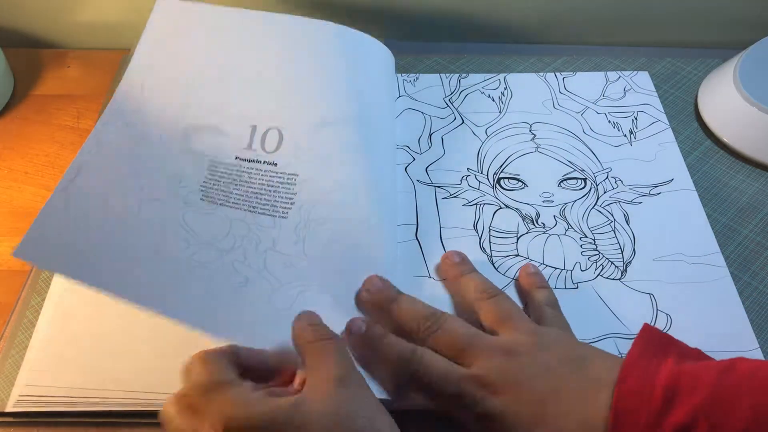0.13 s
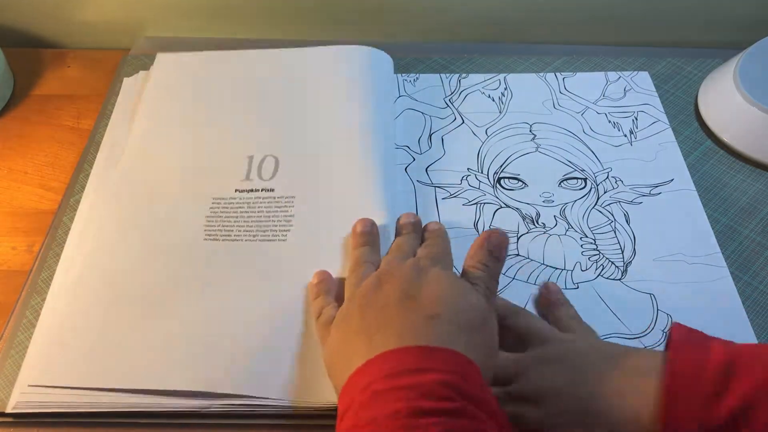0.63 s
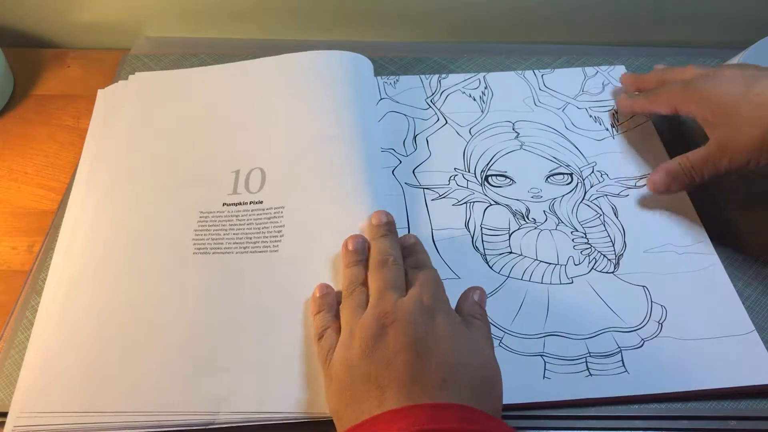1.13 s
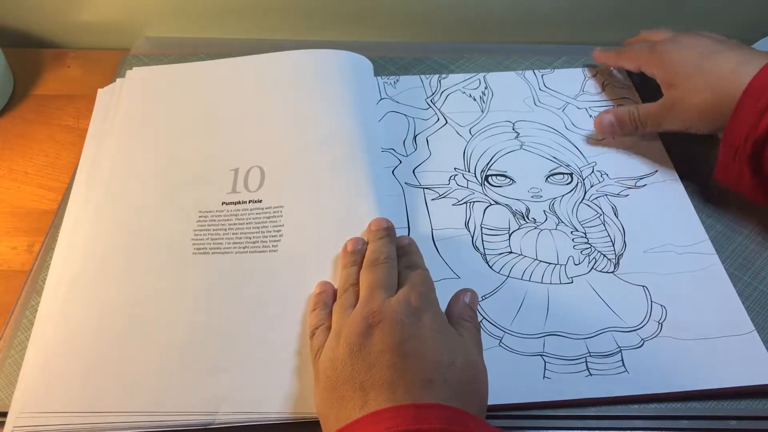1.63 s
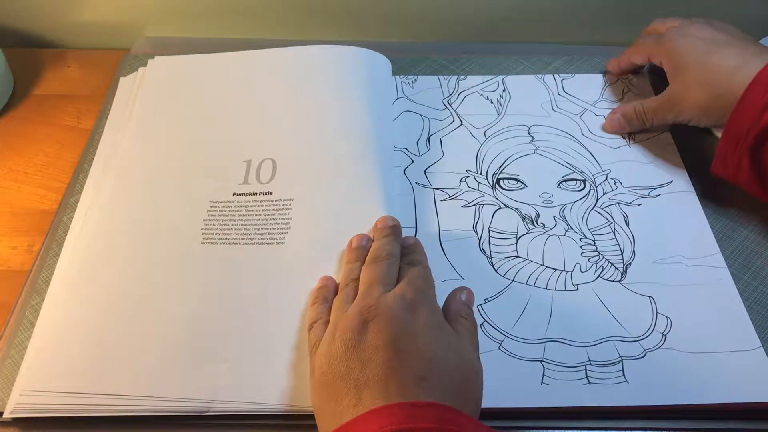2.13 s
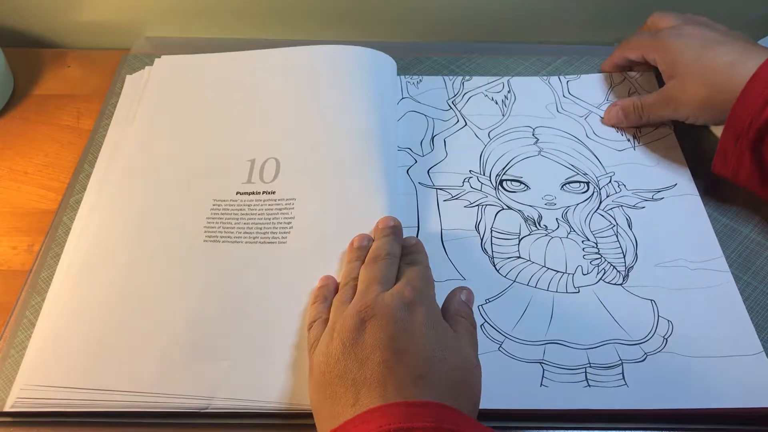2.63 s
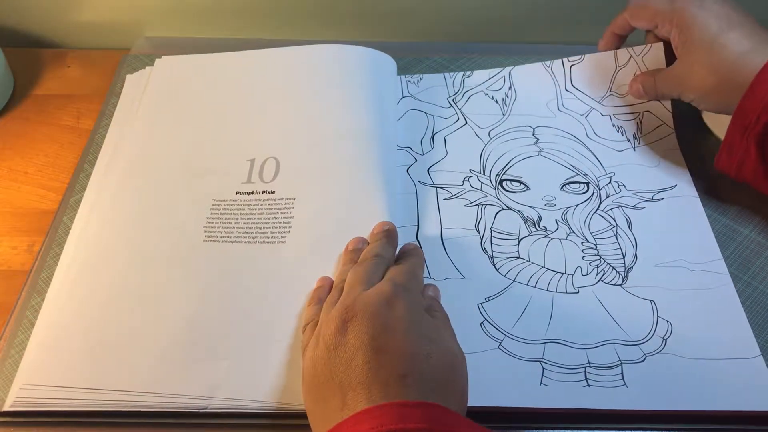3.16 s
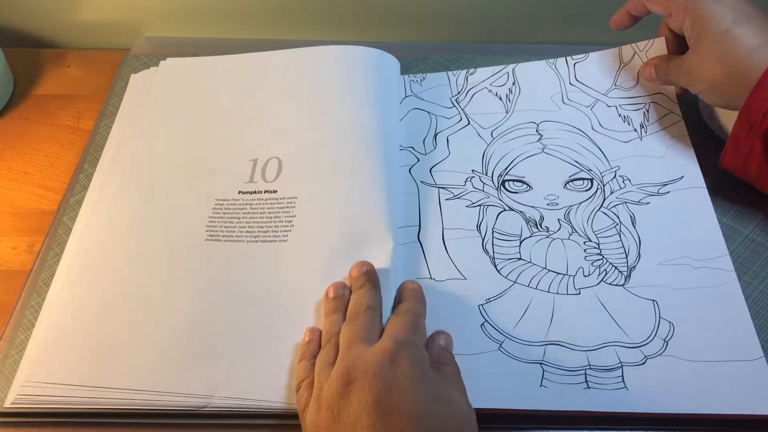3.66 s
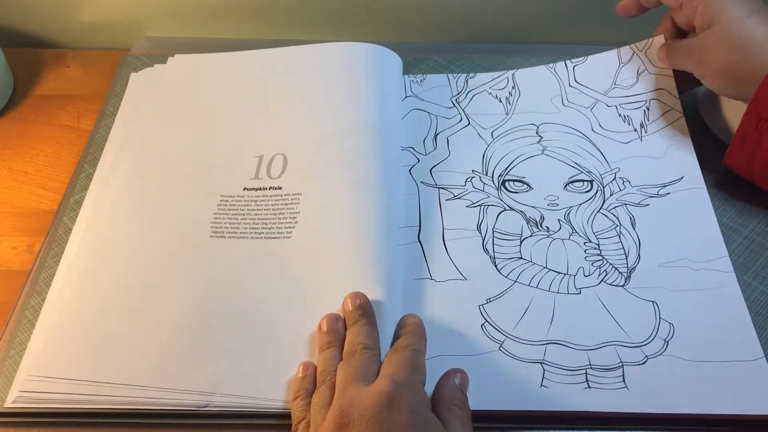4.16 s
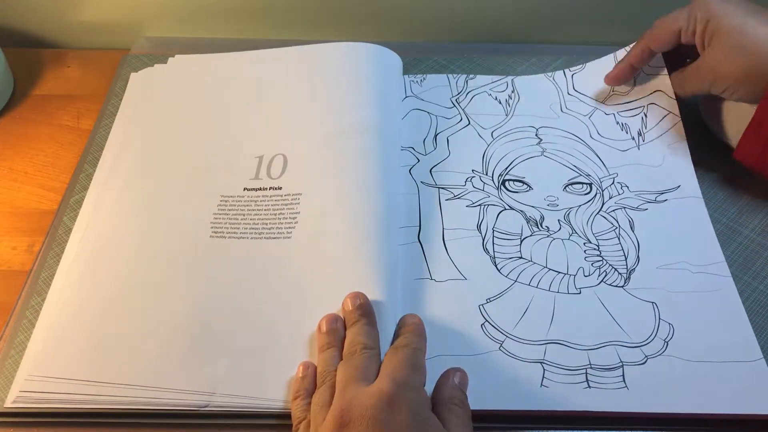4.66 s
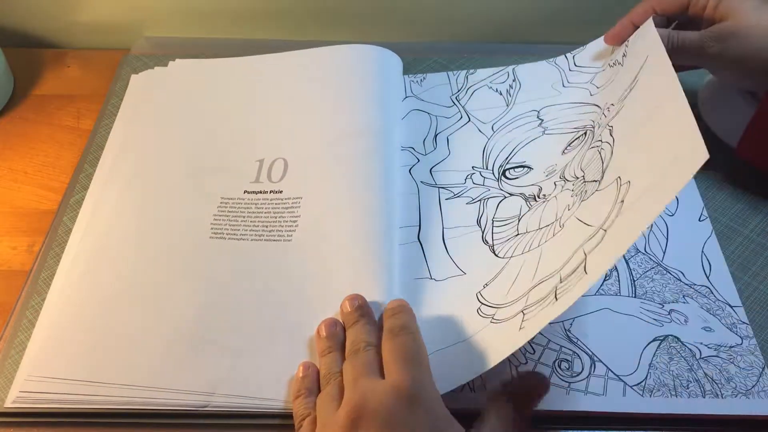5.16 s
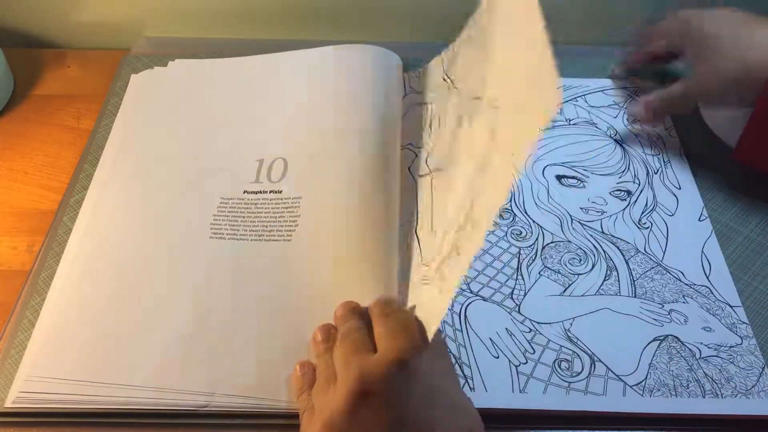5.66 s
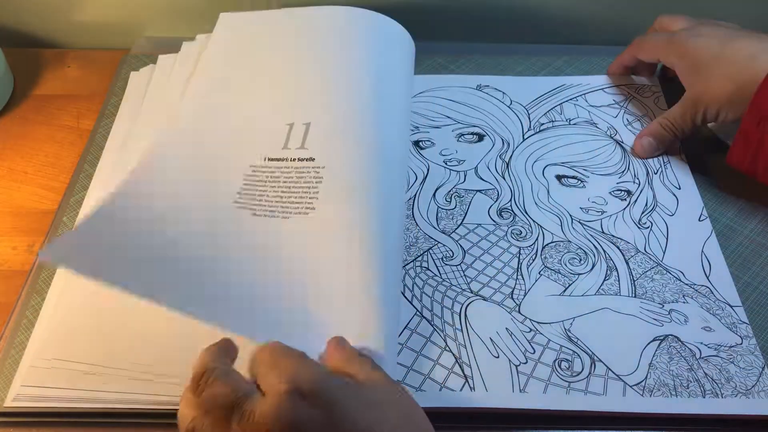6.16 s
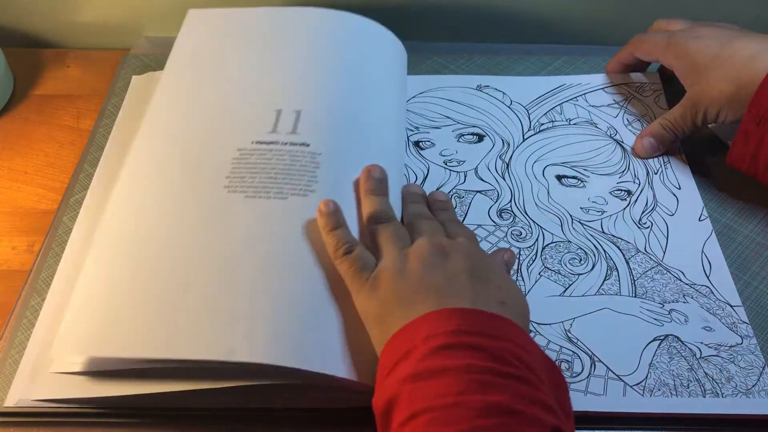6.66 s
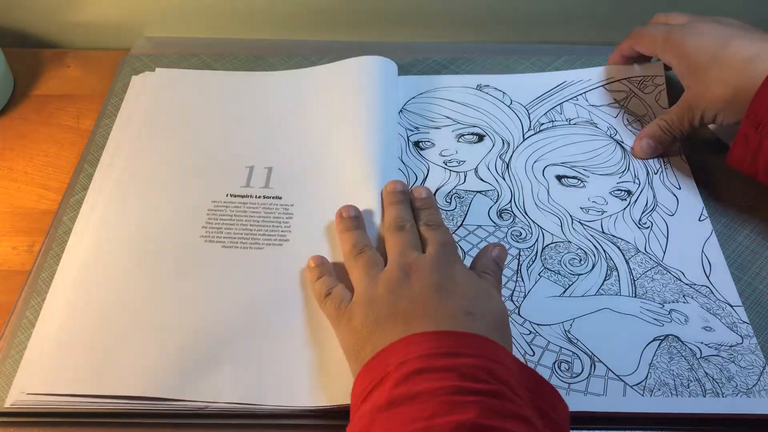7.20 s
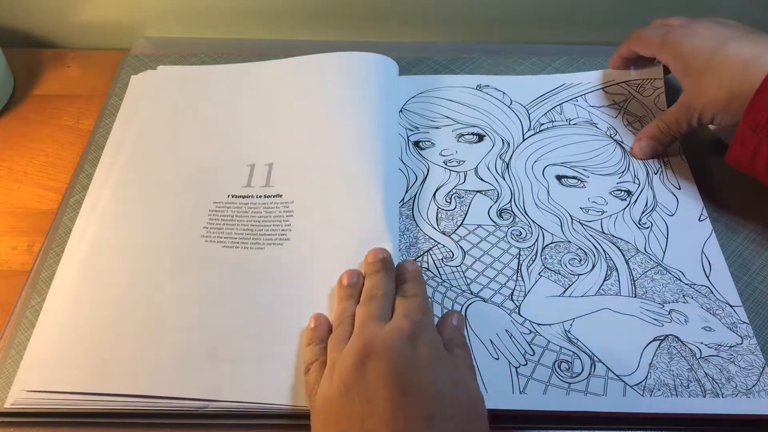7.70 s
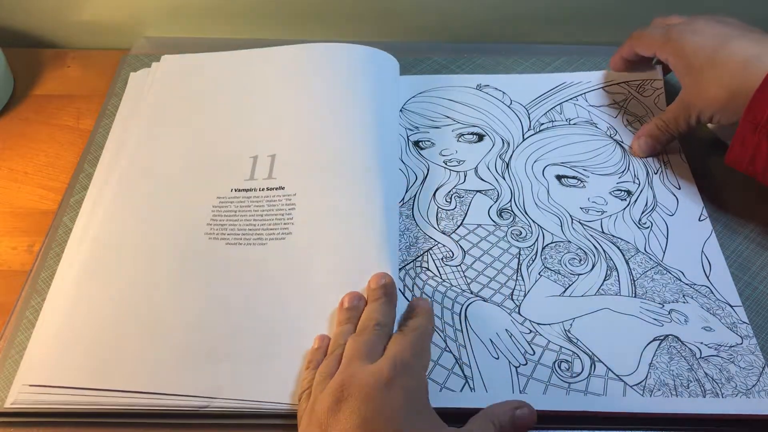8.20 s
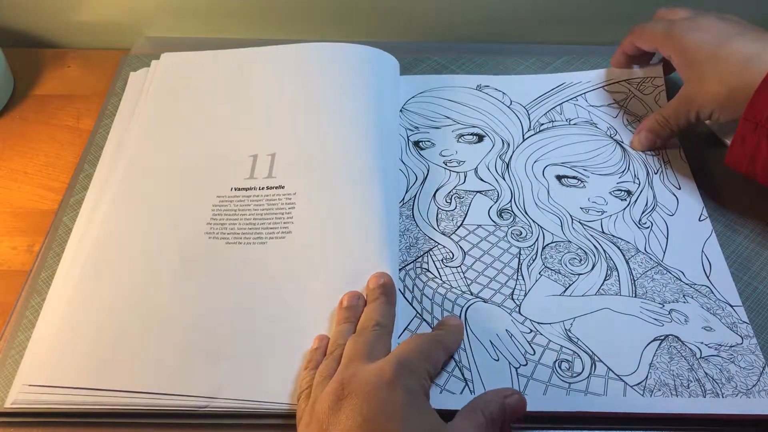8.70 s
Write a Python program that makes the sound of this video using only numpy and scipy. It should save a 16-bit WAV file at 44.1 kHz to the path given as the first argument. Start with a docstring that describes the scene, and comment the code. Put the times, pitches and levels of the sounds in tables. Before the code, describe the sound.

Close to the microphone, a thin page of a large book snaps over loudly and is smoothed flat with dry brushing. Quiet follows, with only faint fingertip ticks and rubs. The sheet edge is worked and crackles, then another page turns with a bright snap and flap. Soft taps and tiny ticks finish in a small room with faint air noise and low distant traffic.

```python
"""Thin pages of a large book crackle and hiss as hands lift, turn and smooth them on a desk in a small room.
Creases snap as noise bursts through a sheet resonance, with a room echo; skin and paper rub as coloured
grains; bent parts of the sheet sing in narrow bands. Behind: steady air noise, far traffic in two low room
modes, wavering hums, faint passing tones, and a bird that starts to chirp at the very end."""
import sys
import numpy as np
from scipy import signal
from scipy.fft import rfft, irfft, next_fast_len
from scipy.io import wavfile
from scipy.ndimage import map_coordinates

SR = 44100
rng = np.random.default_rng(int(sys.argv[2]) if len(sys.argv) > 2 else 0)


def ratio_of_db(decibels):
    """Turn decibels (scalar or array-like) into linear amplitude factors; 0 dB maps to 1."""
    return 10 ** (np.asarray(decibels, float) / 20)


def wav_out(sig):
    """Save sig, one row per channel (or a flat mono array), as 16-bit PCM at SR to the path in sys.argv[1]."""
    wavfile.write(sys.argv[1], SR, np.round(np.clip(np.atleast_2d(sig).T, -1, 1) * 32767).astype(np.int16))


N = 388962

# Room air spectrum. Each row: frequency in Hz, relative density in dB.
AIR_SPECTRUM = [(53, -42), (90, 1.5), (142, -4), (215, -13), (280, -11), (574, -23), (991, -30.5),
                (3290, -43.5), (4270, -40), (4970, -50.5), (9160, -47.5), (10400, -45), (13000, -48.5),
                (15500, -41.5), (16500, -54)]
AIR_DB = -55
# Traffic level. Each row: time in seconds, lower mode in dB, upper mode in dB.
TRAFFIC_LEVELS = [(0.0, -42, -60), (0.22, -51.5, -46), (0.32, -45, -53), (2.97, -47.5, -55.5),
                  (3.66, -50, -47), (6.71, -52, -54), (8.35, -50.5, -48.5), (8.4, -66, -51.5),
                  (8.82, -47, -45.5)]
# Two lowest room modes. Each row: frequency in Hz, width in Hz.
ROOM_MODES = [(46, 16), (66, 13.3)]
# Wavering hums. Each row: frequency in Hz, width in Hz, level in dB.
HUMS = [(119.8, 5.3, -61.5), (163.4, 22, -62.5), (247, 1.6, -76)]
# Faint passing tones. Each row: start in seconds, end in seconds, frequency in Hz, level in dB.
PASSING_TONES = [(2.2, 4.3, 475, -69), (2.6, 3.6, 533, -77), (7.4, 8.6, 452, -75), (8.0, 9.2, 966, -77)]
CHIRP_S, CHIRP_HZ, CHIRP_WIDTH_HZ, CHIRP_DB = 8.78, 3437, 174, -40
# Echo of room and desk. Each row: band in Hz, relative level in dB, 60 dB decay in seconds (see ECHO_MAX_T60_S).
ECHO_BANDS = [(390, -14.5, 0.3), (780, -1.5, 0.18), (1300, -4.5, 0.19), (2170, 7, 0.067), (3780, 4.5, 0.18),
              (5610, -1, 0.12), (9900, -3, 0.22)]
ECHO_MAX_T60_S = 0.28

# Spectra of the three friction scales. Each row: frequency in Hz, relative density in dB.
FLUTTER_SPECTRUM = [(220, -18), (380, 0), (505, -6), (748, -1.5), (1130, -2.5), (1230, -2.5), (2500, -11),
                    (3250, -56), (5500, -120)]
RASP_SPECTRUM = [(880, -20.5), (1500, 5.5), (1900, -0.5), (2240, 0.5), (2550, 2.5), (2880, 1), (4290, -4.5),
                 (5000, -4), (5760, -5.5), (8000, -19), (10400, -46.5), (17600, -120)]
HISS_SPECTRUM = [(3240, -36.5), (5500, -12.5), (6830, -1), (7590, -6.5), (9820, -1), (10600, -1),
                 (11600, -4), (15100, -3.5), (16200, -19.5), (16500, -38.5)]
# Skin and paper slide over paper. Each row: start in seconds, hold in seconds, 20 dB fade in seconds,
# rasp level in dB, hiss re rasp in dB.
SLIDES = [(0.0, 0.064, 0.6, -64.5, 2.5), (.11, 0.066, 0.0347, -46, -7), (.225, 0.017, -0.02, -46.5, 1.5),
          (.47, 0.017, 0.8, -69, -4.5), (.58, 0.086, 0.85, -64.5, 0), (.66, 0.039, 0.5, -64.5, 5),
          (.76, 0.0035, 0.12, -60, -0.5), (.89, 0.01, 0.35, -59.5, -3.5), (1.055, 0.0051, 0.22, -58, -1),
          (1.195, 0.009, 0.1, -60, 1.5), (1.4, .01, 0.8, -77, 1), (1.68, .12, 0.9, -72.5, 3.5),
          (1.846, 0.017, 0.22, -63, -2), (2.02, 0.087, -0.1, -68, 1), (2.179, 0.015, -0.3, -71, -2),
          (2.275, .005, 0.14, -70.5, 2), (2.345, 0.0087, 0, -67.5, 1.5), (2.58, .01, .15, -75, 3),
          (2.644, .005, 0.06, -65, -1.5), (2.755, 0.058, 0.34, -73.5, 3), (3.03, .085, .03, -55, -3),
          (3.17, .1, -0.04, -57.5, -5), (3.29, 0.019, 0.03, -56.5, 1.5), (3.38, .1, 1.5, -76, -4),
          (3.52, .23, 0.2, -59, -1.5), (3.8, 0.008, 0.25, -64.5, 2), (4.06, 0.039, 1, -67, -5),
          (4.121, 0.0057, 0.15, -57, -0.5), (4.24, 0.056, 0.03, -58.5, 2), (4.455, 0.028, -0.6, -62, -13),
          (4.59, 0.13, .05, -56.5, -6.5), (4.715, 0.0076, .1, -56, -9.5), (4.81, 0.03, 0.16, -59.5, -8.5),
          (4.865, 0.031, 0.03, -49, -9), (5.0, .14, 0.24, -66, -7), (5.23, 0.074, 1.2, -72.5, -3),
          (5.44, .04, 0.8, -64, -4), (5.495, 0.031, 0.09, -56, -2.5), (5.83, 0.21, 0.75, -59.5, 2),
          (6.09, 0.14, 0.16, -56, -4.5), (6.29, 0.0033, 0.0766, -47, 1.5), (6.35, 0.07, 0.1, -56.5, -7.5),
          (6.455, 0.0055, 0.38, -52.5, -1.5), (6.7, 0.0064, .35, -60, -1), (7.244, 0.023, .04, -65, -3.5),
          (7.36, 0.086, -0.34, -69.5, 4.5), (7.46, 0.22, 0.03, -60.5, -1.5), (7.71, 0.11, .5, -66.5, 2.5),
          (8.07, 0.11, 0.5, -75, 5.5), (8.2, 0.0043, 0.08, -58.5, -5), (8.24, .006, 0, -66, -5),
          (8.338, .05, 0.1, -68, -6), (8.575, .02, 0.07, -66.5, 13.5), (8.72, .015, .06, -69.5, 8.5)]
# The loose sheet shakes and settles. Each row: start in seconds, hold in seconds, 20 dB fade in seconds,
# flutter level in dB.
SHAKES = [(.14, .01, 0.25, -47.5), (0.23, 0.079, 0.0553, -43.5), (0.657, 0.072, 0.17, -51),
          (1.042, .01, 0.08, -54.5), (1.873, .03, 0.05, -63.5), (2.05, .03, -2.8, -66.5),
          (2.648, .01, 0, -62.5), (2.782, .06, 0.2, -69), (3.247, .055, 0.1, -59.5),
          (4.719, .01, -0.04, -52), (4.816, .04, -0.35, -56), (4.87, 0.03, 0, -49),
          (5.004, .19, -0.05, -62.5), (5.3, .03, 2.2, -68.5), (5.555, .04, 0.14, -54.5),
          (6.29, .01, 0.15, -39), (6.35, .05, 0.48, -67), (7.06, .01, .08, -54), (7.716, .005, 0.09, -52),
          (7.974, .01, .2, -62), (8.198, .005, -0.02, -57)]
RISE_S, MIN_FADE_S = 0.036, 0.01   # 20 dB rise of every contact; shorter or negative fades use the minimum
REST_FLUTTER_DB, REST_RASP_DB, REST_HISS_DB = -72, -83, -84   # hands resting on the book
SLIDE_FLUTTER_DB, SHAKE_RASP_DB, SHAKE_HISS_DB = -6, -20.5, -25.5   # re the motion that stirs them
RING_HZ, RING_DB_PER_DB = 3900, 0.15   # rasp ring pitch where hiss equals flutter; pitch dB per dB of excess
# Bent part of the sheet sings. Each row: start in seconds, hold in seconds, 20 dB fade in seconds,
# level in dB, pitch in Hz.
EDGE_RINGS = [(2.26, .08, .04, -75.5, 4200), (0.894, 0.048, 0.45, -67, 3100), (2.96, .04, -1.1, -69, 4070),
              (3.028, 0.073, 0.14, -59.5, 3700), (3.185, 0.13, .04, -61.5, 3400),
              (3.625, 0.011, 0.02, -52, 1800), (4.1, 0.082, 0.2, -66, 4400), (4.23, .04, .1, -62, 3130),
              (4.604, 0.13, 0.2, -67, 4500), (4.72, .03, 0.2, -57, 1620), (4.87, 0.013, 0.09, -49, 1660),
              (4.983, 0.16, -0.06, -67, 4300), (5.034, 0.16, -0.4, -63.5, 1600),
              (5.5, 0.03, 0.2, -62, 2700), (5.6, 0.025, 0.4, -57, 580), (5.726, .015, 0.3, -58, 430),
              (5.848, .012, .04, -64.5, 450), (5.86, 0.064, 0.5, -62.5, 2800), (6.0, .02, 0.5, -61.5, 417),
              (6.455, .025, -0.1, -54, 2670), (7.04, .015, -0.06, -61.5, 810),
              (7.255, 0.017, -0.2, -71, 3900), (7.446, 0.025, -0.3, -66, 3900), (7.7, .02, .07, -52, 800),
              (7.993, .015, 0.04, -52.5, 780), (8.24, 0.021, -0.03, -61, 4000),
              (8.332, 0.034, 0.14, -61.5, 3980), (8.333, 0.043, .1, -65, 5960),
              (8.578, 0.064, -0.4, -67, 4100), (8.72, .02, .04, -74, 4180)]
EDGE_WIDTH_SHARE = 0.18   # of the pitch
# Buckling snaps. Each row: time in seconds, nominal peak in dB, sheet ring in Hz, crack re ring in dB,
# length in ms.
SNAPS = [(0.096, -8, 1440, -32, 0.32), (0.0987, -4.5, 1340, -4.5, 1.25), (0.2281, -36, 1300, 7.5, 3),
         (0.5205, -33, 1410, -23, 2.06), (0.5657, -36, 2400, -12, 0.77), (0.6552, -34.5, 804, 3.5, 0.62),
         (0.6728, -9.5, 1300, -19.5, 1.07), (1.3003, -40, 2350, -4, 0.9), (1.8453, -41, 4050, 6.5, 0.32),
         (2.1216, -51, 4500, 4, 1.7), (2.154, -45, 4350, 1, 1.6), (2.1727, -45, 4350, 6, 1.7),
         (2.5535, -38.5, 660, -19, 1.14), (2.749, -54.5, 3800, 7, 0.6), (2.8258, -57, 3800, 10, 2.6),
         (3.0224, -44, 4220, -8, 1.2), (3.6126, -27.5, 1300, -2.5, 2.3), (4.1168, -43, 4090, 5, 2.7),
         (4.461, -47, 3680, -13, 0.9), (4.563, -61, 1500, 0, 1.5), (4.583, -51, 1200, 0, 1.5),
         (4.71, -36.5, 1730, -11, 0.41), (4.8665, -32.5, 1190, -6, 5.7), (5.5493, -33, 1620, -22.5, 3.1),
         (5.5961, -31.5, 720, -8.5, 5.1), (5.605, -31, 1560, -13, 2.5), (5.627, -61, 3920, -10.5, .88),
         (5.7014, -52, 3800, -4, 1.3), (6.273, -22, 1500, -3, 1.85), (6.2758, -14, 1880, -5.5, 3.5),
         (6.5, -38, 1300, -17, 2.4), (6.546, -42, 2500, -3, 1.3), (6.557, -42, 2470, 0, 1.1),
         (6.6944, -42.5, 1470, -17, 1.3), (6.756, -47, 2000, -12, 1.1), (6.8552, -37.5, 780, -27, 1.8),
         (7.0324, -27, 1030, -15, 2.5), (7.2354, -56, 2510, 8.5, 2.1), (7.4394, -40.5, 3700, -16, 0.78),
         (7.6942, -24, 910, 4.5, 1.56), (7.9656, -39, 1300, -21, 1.9), (7.9782, -26.5, 920, -19.5, 2.3),
         (8.1898, -37, 1490, 4, 0.58), (8.2002, -49, 1510, 7, 1.1), (8.2146, -37, 1430, 3.5, 0.62),
         (8.2245, -48, 1490, -8, 0.94), (8.2378, -40, 4160, -15, 0.9), (8.464, -65, 4000, 3.5, 1.5),
         (8.535, -60, 4000, 3, 1.5), (8.559, -44.5, 4240, 14, 0.35), (8.5827, -42, 4330, -19, 0.61),
         (8.743, -52, 3800, 8, 1.3)]
SNAP_ECHO_DB, ECHO_DB_PER_DOUBLING = -10.5, 3   # echo of a 1 ms snap; longer creases feed the room more
# Microphone housing resonances and notches. Each row: frequency in Hz, width in Hz, share added.
HOUSING = [(3100, 190, 0.19), (4330, 310, 0.65), (4960, 85, -0.55), (5660, 550, 0.15), (6710, 170, -0.79),
           (10420, 1600, -0.63)]


def rms_one(x):
    """Scale to unit power."""
    return x / np.sqrt(np.mean(x ** 2) + 1e-20)


def coloured(x, spectrum):
    """Give a white signal a spectrum, interpolated over log frequency; rms 1."""
    hz, db = np.transpose(spectrum)
    size = next_fast_len(len(x))
    log_hz = np.log(np.arange(size // 2 + 1) * SR / size + 1)
    gain = ratio_of_db(np.interp(log_hz, np.log(hz), db, -120, -120))
    return rms_one(irfft(rfft(x, size) * gain, size)[:len(x)])


def resonate(x, hz, width_hz):
    """Two-pole resonance with about unit gain at its peak."""
    r = np.exp(-np.pi * width_hz / SR)
    poles = [1, -2 * r * np.cos(2 * np.pi * hz / SR), r * r]
    return signal.lfilter([(1 - r * r) / 2, 0, (r * r - 1) / 2], poles, x)


def resonate_twice(x, hz, width_hz):
    """Two equal resonances in series, for steeper skirts."""
    return resonate(resonate(x, hz, width_hz), hz, width_hz)


def swept(x, centre_hz, share):
    """Resonance whose centre moves, stepped every 256 samples; width a share of the centre; rms 1."""
    out, state = np.empty(N), np.zeros(2)
    for i in range(0, N, 256):
        hz = centre_hz[i]
        r = np.exp(-np.pi * share * hz / SR)
        gain = np.sqrt(1 - r * r)
        poles = [1, -2 * r * np.cos(2 * np.pi * hz / SR), r * r]
        out[i:i + 256], state = signal.lfilter([gain, 0, -gain], poles, x[i:i + 256], zi=state)
    return rms_one(out)


def drift(rate_hz):
    """Smooth random curve of about unit spread through rate_hz knots a second."""
    knots = rng.standard_normal(2000)
    return map_coordinates(knots, [np.arange(N) * rate_hz / SR], order=3)


def narrow(hz, width_hz):
    """Narrow-band noise, its first second dropped while the filter settles; rms 1."""
    return rms_one(resonate_twice(rng.standard_normal(N + SR), hz, width_hz)[SR:])


def air():
    """Room air: coloured noise with a slow level drift."""
    return ratio_of_db(AIR_DB + 1.5 * drift(2.77)) * coloured(rng.standard_normal(N), AIR_SPECTRUM)


def traffic():
    """Far traffic: noise in the two lowest room modes, each with its own level curve."""
    t, out = np.arange(N) / SR, np.zeros(N)
    s, *mode_levels = np.transpose(TRAFFIC_LEVELS)
    for db, (hz, width_hz) in zip(mode_levels, ROOM_MODES):
        out += ratio_of_db(np.interp(t, s, db)) * narrow(hz, width_hz)
    return out


def hums():
    """Noise bands so narrow that they sound as wavering hums."""
    return sum(ratio_of_db(db) * narrow(hz, width_hz) for hz, width_hz, db in HUMS)


def passing_tones():
    """Narrow noise bands that swell and fade under a root-sine arch."""
    t, out = np.arange(N) / SR, np.zeros(N)
    for start, end, hz, db in PASSING_TONES:
        swell = np.sqrt(np.sin(np.pi * np.clip((t - start) / (end - start), 0, .9999)))
        out += ratio_of_db(db + 1.5 * drift(5)) * swell * narrow(hz, 10)
    return out


def bird():
    """Start of a chirp: a whistle of narrow, uneven noise that swells in within 8.4 ms."""
    t = np.arange(N) / SR - CHIRP_S
    whistle = narrow(CHIRP_HZ, CHIRP_WIDTH_HZ)
    return ratio_of_db(CHIRP_DB) * np.clip(t / 0.0084, 0, 1) * whistle / np.std(whistle[t > 0])


def echo(x):
    """Dense reflections that build in 2 ms and die band by band; unit-energy response."""
    t, answer = np.arange(SR // 2) / SR, 0
    for hz, db, t60_s in ECHO_BANDS:
        band = rms_one(resonate_twice(rng.standard_normal(len(t)), hz, .65 * hz))
        decay = ratio_of_db(db - 60 * t / min(t60_s, ECHO_MAX_T60_S))
        answer = answer + band * decay * np.minimum(t / .002, 1)
    return signal.fftconvolve(x, answer / np.sqrt(np.sum(answer ** 2)))[:N]


def grains(per_s, spread_db, smooth):
    """Fibres catch and let go: uneven ticks on top of a smooth friction noise."""
    sizes = ratio_of_db(spread_db * np.minimum(rng.exponential(1, N), 4)) * rng.choice([-1, 1], N)
    born = rng.random(N) < per_s / SR
    return rms_one(sizes * born) + smooth * rng.standard_normal(N)


def contacts(s, hold_s, fade_s, db):
    """Summed power over time of contacts that rise, hold and fade, linearly in dB."""
    t, power = np.arange(0, N, 64) / SR, 0
    for start, hold, fade, level_db in zip(s, hold_s, fade_s, db):
        rise_db = 20 * np.maximum((start - t) / RISE_S, 0)
        fade_db = 20 * np.maximum(t - start - hold, 0) / max(fade, MIN_FADE_S)
        power = power + ratio_of_db(level_db - rise_db - fade_db) ** 2
    return np.interp(np.arange(N) / SR, t, power)


def friction_levels():
    """Flutter, rasp and hiss in dB, each stirred by slides, shakes and rest; rasp ring pitch in Hz."""
    *when, rasp_db, hiss_re_rasp_db = np.transpose(SLIDES)
    slide = contacts(*when, rasp_db)
    fine = contacts(*when, rasp_db + hiss_re_rasp_db)
    shake = contacts(*np.transpose(SHAKES))
    flutter_db = 10 * np.log10(shake + slide * ratio_of_db(SLIDE_FLUTTER_DB) ** 2 + ratio_of_db(REST_FLUTTER_DB) ** 2)
    rasp_db = 10 * np.log10(slide + shake * ratio_of_db(SHAKE_RASP_DB) ** 2 + ratio_of_db(REST_RASP_DB) ** 2)
    hiss_db = 10 * np.log10(fine + shake * ratio_of_db(SHAKE_HISS_DB) ** 2 + ratio_of_db(REST_HISS_DB) ** 2)
    ring_hz = np.clip(RING_HZ * ratio_of_db(RING_DB_PER_DB * (hiss_db - flutter_db)), 2000, 7000)
    return flutter_db, rasp_db, hiss_db, ring_hz


def rubbing():
    """Three scales of friction, from the flapping sheet to the finest fibres, pulsing together."""
    flutter_db, rasp_db, hiss_db, ring_hz = friction_levels()
    jerk_db = 1.2 * drift(14) + 1.2 * drift(40) + .8 * drift(150)
    flutter = coloured(grains(1500, 2.3, 1.5), FLUTTER_SPECTRUM)
    fibres = grains(1500, 4.7, 2.0)
    rasp = coloured(fibres, RASP_SPECTRUM)
    # the gap under the sheet rings, higher as it closes
    rasp = rms_one(1.1 * rasp + swept(rasp, ring_hz, 0.69))
    hiss = coloured(fibres, HISS_SPECTRUM)
    paper = ratio_of_db(flutter_db + jerk_db) * flutter
    paper = paper + ratio_of_db(rasp_db + jerk_db) * rasp
    paper = paper + ratio_of_db(hiss_db + jerk_db) * hiss
    # the bent sheet's many modes wax and wane as its shape changes
    out = .75 * paper
    for hz in np.geomspace(900, 12000, 30):
        out = out + .45 * ratio_of_db(4.5 * drift(12)) * resonate(paper, hz, .045 * hz)
    return out


def edge_rings():
    """Friction grains drive the resonance of a bent part of the sheet while it is rubbed or shaken."""
    fibres, out = grains(1500, 4.9, 0.91), np.zeros(N)
    for s, hold_s, fade_s, db, hz in EDGE_RINGS:
        span = slice(int((s - .2) * SR), int((s + .6) * SR))
        band = rms_one(resonate_twice(fibres[span], hz, EDGE_WIDTH_SHARE * hz))
        envelope = np.sqrt(contacts([s], [hold_s], [fade_s], [db]))
        out[span] += envelope[span] * band
    return out * ratio_of_db(2.1 * drift(35))


def snaps():
    """A crease pops through: a burst that rings the sheet for a few cycles plus a brighter crack."""
    direct, to_room = np.zeros(N), np.zeros(N)
    t = np.arange(2000) / SR
    for s, db, hz, crack_db, ms in SNAPS:
        run = 1000 * t / ms
        shape = run * np.exp(-2 * run)   # longer creases swell before they die
        burst = rng.standard_normal(len(t)) * shape
        pair = np.stack([burst, t == 0])   # heard directly; single push that the room answers
        ring_low = signal.butter(2, 1.36 * hz, fs=SR, output="sos")
        crack_band = signal.butter(2, [1.7 * hz, min(6.5 * hz, 15500)], "band", fs=SR, output="sos")
        ring = signal.sosfilt(ring_low, resonate(pair, hz, 0.83 * hz))
        crack = signal.sosfilt(crack_band, pair)
        gain = ratio_of_db(db - 5) / rms_one(shape).max()
        echo_gain = gain * ratio_of_db(SNAP_ECHO_DB + ECHO_DB_PER_DOUBLING * np.log2(ms))
        at = round(s * SR)
        span = slice(at, at + len(t))
        direct[span] += gain * (rms_one(ring[0]) + ratio_of_db(crack_db) * rms_one(crack[0]))
        to_room[span] += echo_gain * (rms_one(ring[1]) + 0.64 * ratio_of_db(crack_db) * rms_one(crack[1]))
    # thin paper radiates little bass
    return signal.sosfilt(signal.butter(2, 520, "high", fs=SR, output="sos"), direct + echo(to_room))


def scene():
    """All sources at one microphone."""
    background = air() + traffic() + hums() + passing_tones() + bird()
    return (background + rubbing() + edge_rings() + snaps())[None]


def roll_off(x):
    """The treble ends steeply here."""
    return signal.sosfilt(signal.butter(12, 16990, fs=SR, output="sos"), x)


def record(dry):
    """The housing colours the treble, lowest bass and very top are dropped, peaks are rounded."""
    for hz, width_hz, share in HOUSING:
        dry = dry + share * resonate(dry, hz, width_hz)
    low_cut = signal.sosfilt(signal.butter(2, 28, "high", fs=SR, output="sos"), dry)
    top_cut = signal.sosfilt(signal.cheby2(10, 45, 16400, fs=SR, output="sos"), low_cut)
    mix = 0.67 * np.tanh(top_cut / 0.73)
    return roll_off(mix)


dry = scene()
out = record(dry)
wav_out(out)
```